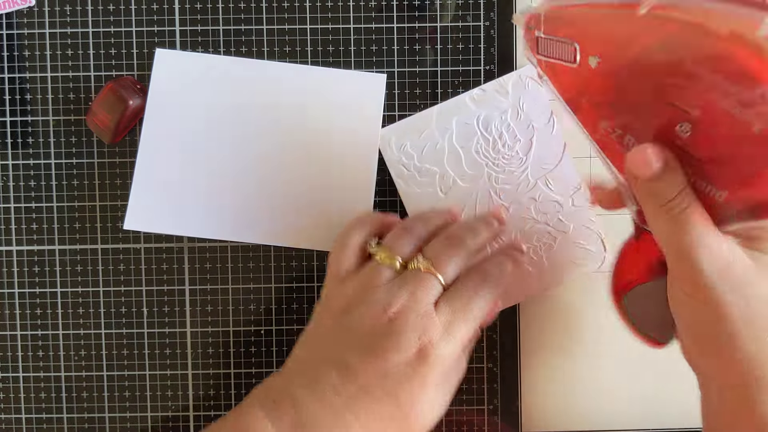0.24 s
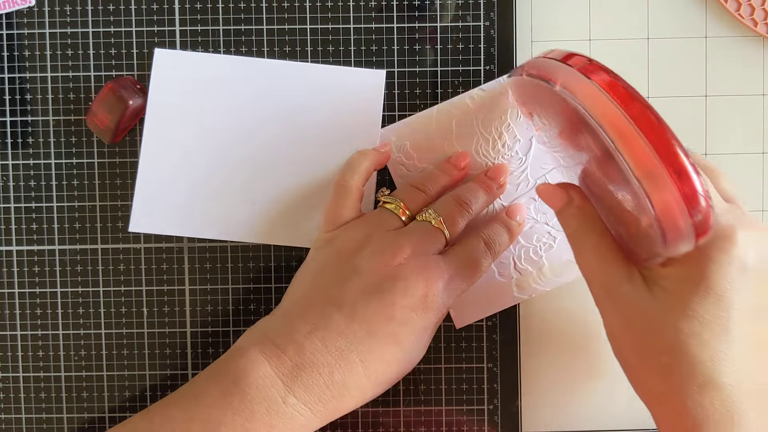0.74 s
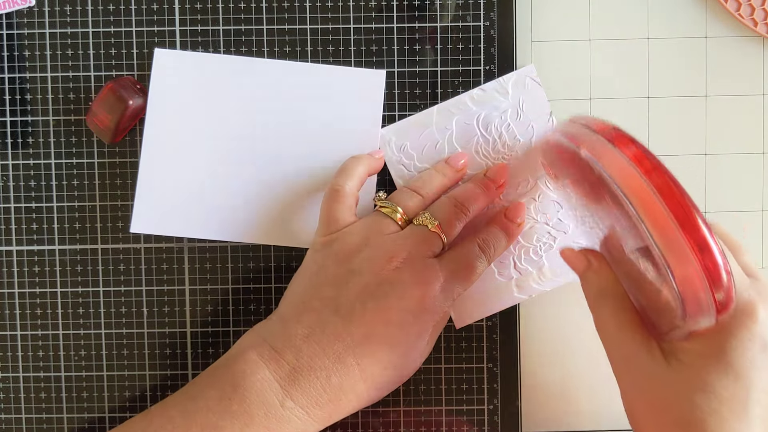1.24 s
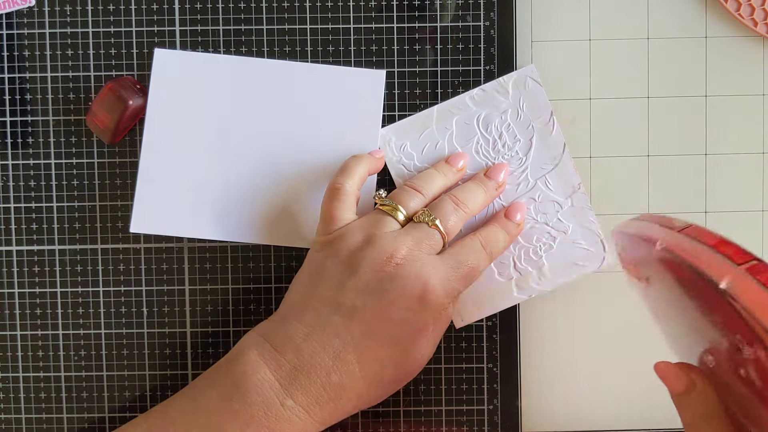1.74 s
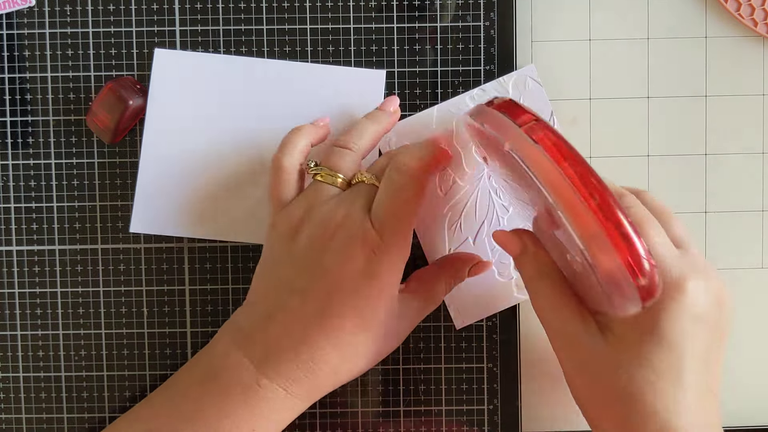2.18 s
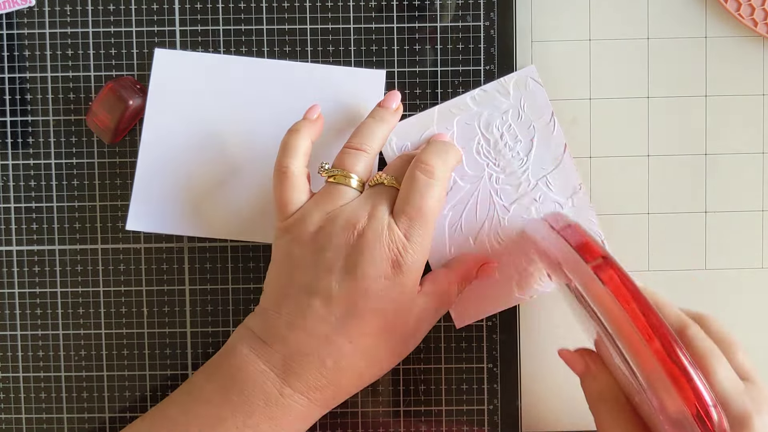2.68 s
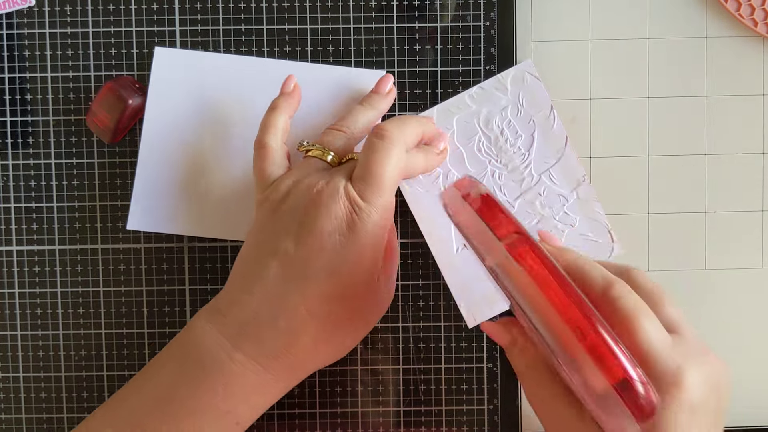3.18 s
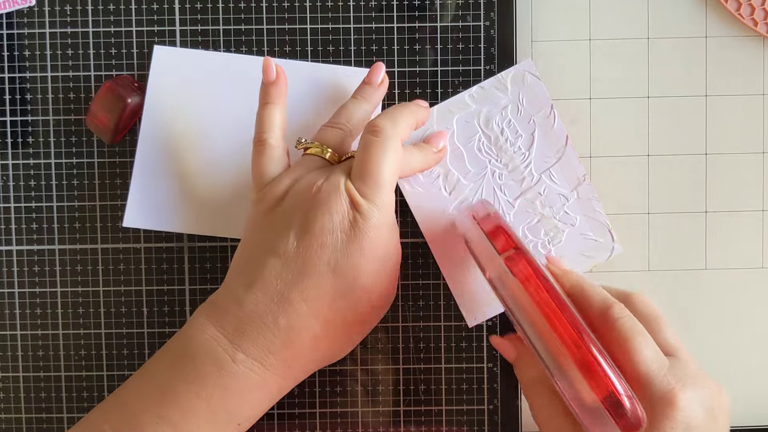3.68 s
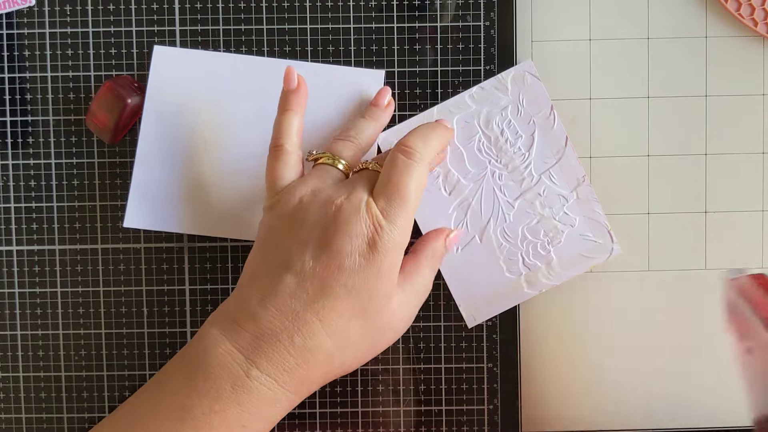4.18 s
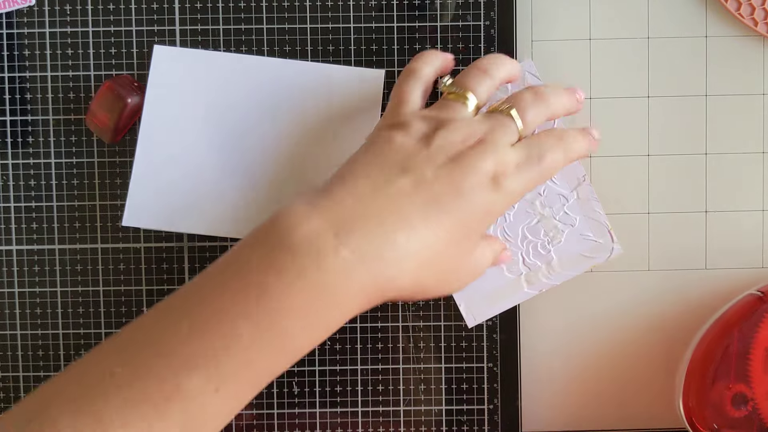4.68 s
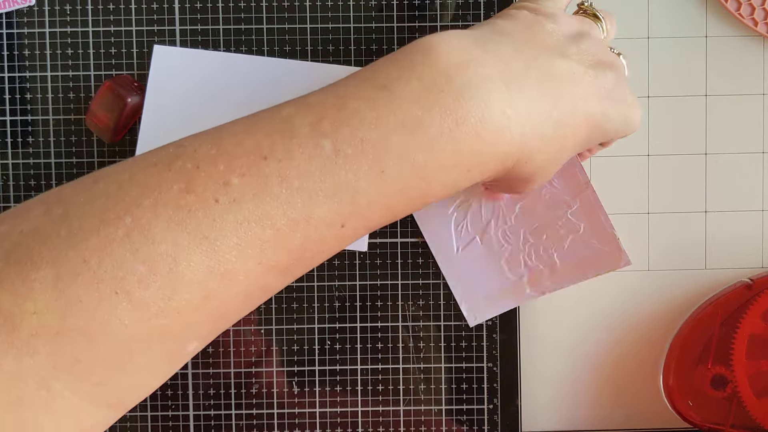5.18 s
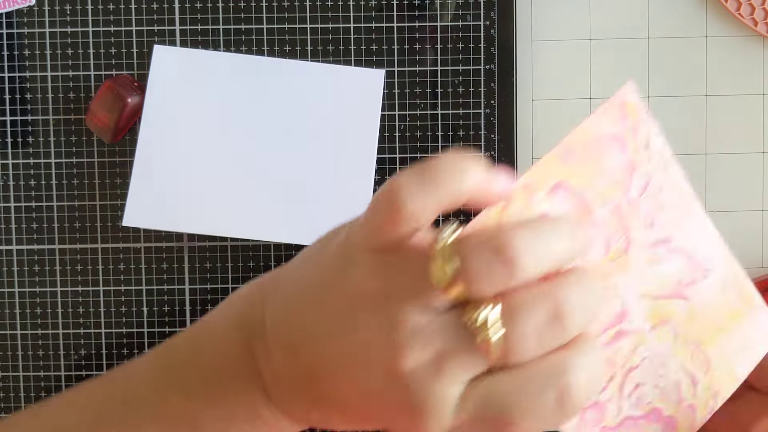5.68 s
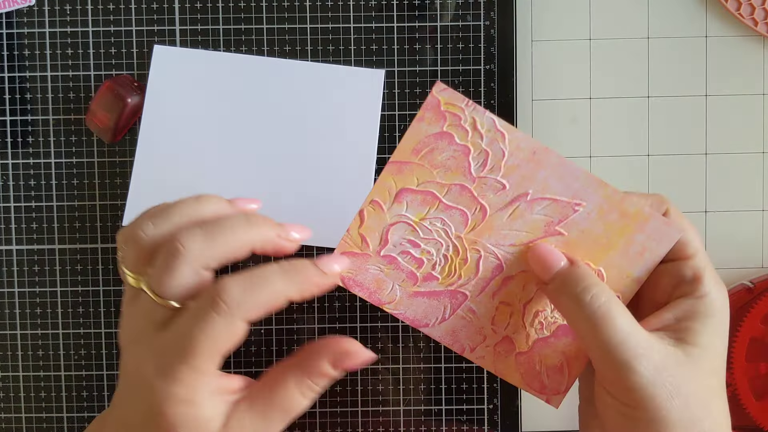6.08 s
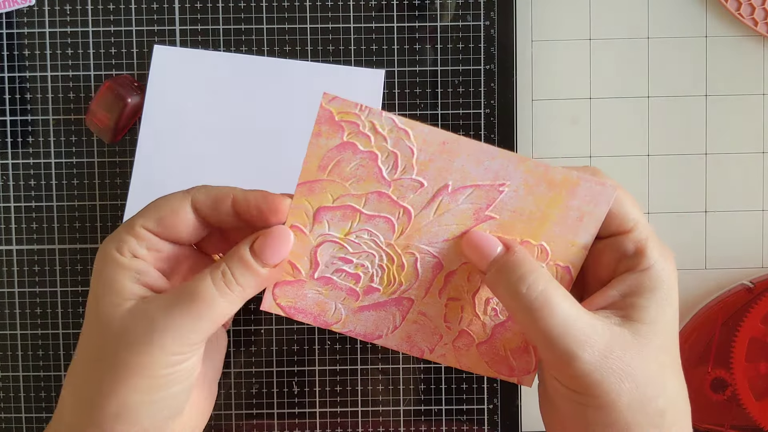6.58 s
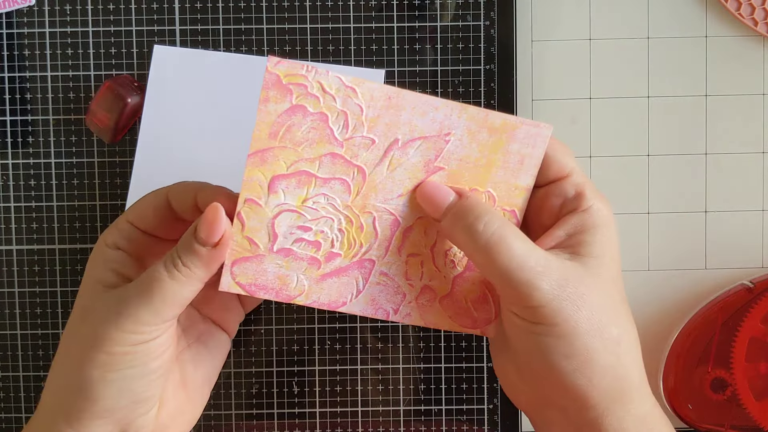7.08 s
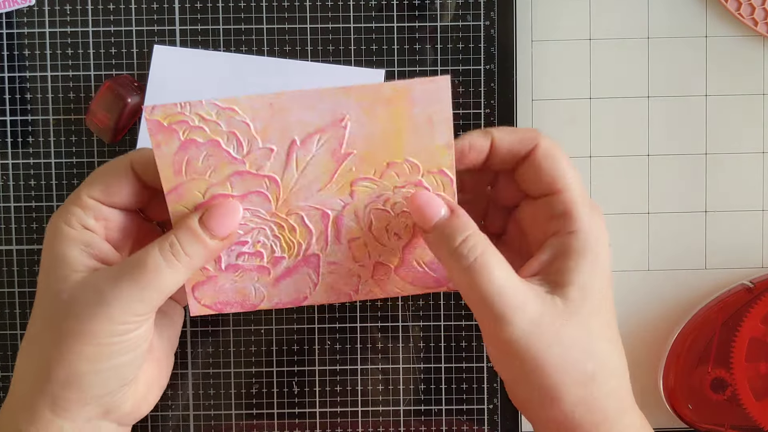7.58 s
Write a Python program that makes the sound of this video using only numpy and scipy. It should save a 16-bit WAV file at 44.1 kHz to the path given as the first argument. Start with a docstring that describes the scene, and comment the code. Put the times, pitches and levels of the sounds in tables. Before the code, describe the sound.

Quiet hum and soft low rumble, with a few light plastic clicks. Three bright, gritty bursts of gear teeth and ratchet clicks follow, as adhesive is rolled onto card. Then comes a hollow plastic drop with a short rattle, a woody knock on the table, fingertip ticks, a brief card scuff, and crisp taps at the end. Heard close up in stereo with a short room echo, leaning left.

```python
"""Tape runner on a craft table

A plastic tape runner lays three strokes of adhesive on a card panel, in a small humming room.
Gear teeth, ratchet clicks and crackling glue ring its hollow housing; random bumps make the roller rumble.
The runner is put down with a dull knock, a hand knocks too, and the panel is lifted and turned with clicks.
Bursts of tiny slips drive the touches; sliding tones make whistles; sines and tinted noise fill the room.
"""
import sys
import numpy as np
from scipy import signal
from scipy.fft import rfft, irfft
from scipy.io import wavfile
from scipy.ndimage import uniform_filter1d

SR = 44100
rng = np.random.default_rng(int(sys.argv[2]) if len(sys.argv) > 2 else 0)


def write(x):
    x = np.atleast_2d(x).T
    wavfile.write(sys.argv[1], SR, np.round(np.clip(x, -1, 1) * 32767).astype(np.int16))


N = 345744
TIME = np.arange(N) / SR  # s

# Levels in the tables are relative: the shapes are rescaled and some layers get a gain later.

# Mains hum: (frequency [Hz], level [dB])
HUM_TONES = [(100, -53), (200, -64), (300, -72), (400, -76)]
# Spectrum of the low room rumble: (frequency [Hz], level [dB])
RUMBLE_SPECTRUM = [(8, -19.5), (22, 6.5), (42, -0.5), (63, -8), (85, -10), (125, -3), (165, -2.5),
                   (240, -9.5), (305, -4), (380, -16), (520, -24), (900, -68.5)]
# Spectrum of the soft hiss: (frequency [Hz], level [dB])
AIR_SPECTRUM = [(210, -48), (350, -16), (398, -3), (424, -11.5), (513, -7.5), (574, -19.5), (621, -8.5),
                (673, -17), (971, -20), (2050, -33), (3820, -27), (5010, -34.5), (5790, -28.5),
                (6680, -34.5), (15800, -37.5)]
# How alike left and right are: (frequency [Hz], likeness [-1 to 1])
LIKENESS = [(35, 0.82), (70, 0.32), (150, 0.25), (300, 0.088), (700, 0.16), (1400, 0.29), (3000, 0.036),
            (16000, 0.021)]
# How much louder left is than right: (frequency [Hz], difference [dB])
LEFT_OVER_RIGHT = [(60, 1.8), (200, 2.4), (400, 3.5), (1000, 4.5), (2400, 4.5), (4500, 5.5), (8000, 4.5),
                   (15000, 9)]
# How long the room echo takes to fall by 60 dB: (frequency [Hz], time [s])
ECHO_TIMES = [(200, 0.48), (530, 0.24), (1400, 0.34), (4500, 0.41), (9000, 0.43), (15000, 0.27)]

# Loose plastic parts of the runner click: (time [s], level [dB], rattle length [s])
RATTLE_EVENTS = [(.248, -56.5, .005), (2.004, -48.5, .003), (2.174, -55.5, 0.0032), (2.275, -47, .0018),
                 (3.039, -44, .0022), (4.086, -39.5, 0.0022), (4.348, -52, .003), (4.9, -40.5, 0.015),
                 (4.961, -47.5, 0.013)]
# The grip tightens and the plastic ticks: (time [s], level [dB], contact length [s])
GRIP_EVENTS = [(.553, -43.5, 0.00084), (.5615, -49.5, 0.00075), (3.028, -47, .0007), (4.087, -43, .002)]
# Spectrum of those ticks: (frequency [Hz], level [dB])
GRIP_SPECTRUM = [(300, -23), (2200, -19), (3050, -4), (3650, 4.5), (4200, -10), (7000, -18), (16000, -31)]

# Card tapped against the table, with brief scuffs of its edge at 0.889 s and 4.251 s: (time [s], level [dB],
# contact length [s])
TAP_EVENTS = [(.889, -43.5, .017), (2.316, -42.5, 0.0045), (4.251, -47, .012), (6.71, -49, 0.00081),
              (7.478, -37.5, 0.0011), (7.542, -38.5, .004), (7.773, -37, 0.0012), (7.8, -36.5, 0.0018)]
# Spectrum of the taps: (frequency [Hz], level [dB])
TAP_SPECTRUM = [(150, -35.5), (250, -2), (525, -0.5), (1030, -6), (1330, -7.5), (1990, -16), (2320, -9.5),
                (2620, -14), (2950, -9.5), (3890, -9.5), (4390, -12.5), (5790, -10.5), (6770, -17),
                (14500, -19), (15500, -19)]
# Spectrum of the dragging panel edge: (frequency [Hz], level [dB])
SCUFF_SPECTRUM = [(150, -43), (250, -8), (559, -1), (1510, -22), (2060, -12.5), (2400, -17), (3750, -15),
                  (4760, -23), (5550, -14.5), (6940, -25), (15000, -24)]
SCUFF_S, SCUFF_DB, SCUFF_RISE_S, SCUFF_FALL_S = 5.958, -39.5, 0.019, 0.0089

# Strokes of the runner: (start [s], length [s], ratchet steps [count], speed at the ends [0-1],
# skew of the speed arch [under 1 = early peak], gear level [dB], ratchet level [dB],
# roller level [dB], shift of the roller's resonances [factor])
STROKE_ROWS = [(1.0898, .6398, 17, .49, 1.06, -40.3, -28.7, -49, 1.04),
               (2.4548, .4208, 14, .35, .75, -39, -31, -46.3, 1),
               (3.628, .3455, 11, .26, .9, -37.6, -30, -48, .9)]
# Resonances of the hollow housing: (frequency [Hz], width before scaling [Hz], level [dB])
HOUSING_MODES = [(1600, 1250, -21.5), (2424, 140, -18), (3390, 550, -13), (4410, 480, -3.5),
                 (4910, 330, -3.5), (5420, 410, 2), (5905, 470, -5.5), (7540, 1200, -11.5),
                 (9570, 710, -13), (12800, 2900, -20), (14270, 1250, -9.5), (16600, 2200, -4.5)]
# Spectrum of roller on card and table, before each stroke's shift: (frequency [Hz], level [dB])
ROLLER_SPECTRUM = [(10, -35), (30, -9), (45, 3), (68, -3), (130, -14.5), (290, -25.5), (370, -14), (435, 4),
                   (520, -5), (620, -4.5), (800, -11.5), (1010, -6.5), (1250, -20.5), (2500, -22),
                   (5000, -35.5)]
GEAR_SWELL_DB, ROLLER_SWELL_DB = 5, 8  # how much quieter the ends of a stroke are than its middle
RATCHET_SPREAD_DB, RATCHET_SLOW_DB = 2.05, 3.5  # scatter of the clicks, and their gain at the ends
RUN_ON_S = .016  # the reel keeps turning after the last ratchet click

# Hollow tones as the runner is seated, one nearly steady and one sinking:
# (time [s], length [s], start pitch [Hz], end pitch [Hz], level before flutter [dB])
SEATING_TONES = [(2.312, 0.0267, 933, 940, -53), (2.335, 0.071, 926, 858, -63.5)]
# Faint whistles: (time [s], length [s], start pitch [Hz], end pitch [Hz], level before flutter [dB])
WHISTLE_TONES = [(4.84, .06, 4300, 4100, -68.5), (4.968, .14, 4550, 4700, -74),
                 (5.61, 0.12, 5450, 5630, -72.5), (5.68, 0.063, 3650, 3490, -71),
                 (5.736, 0.15, 6300, 6340, -75), (5.72, 0.29, 3200, 3070, -75)]

# Fingertips tick on the hollow housing and the bowed card: (time [s], level [dB], ring pitch [Hz])
FINGER_EVENTS = [(3.0, -44.5, 2060), (4.054, -44.5, 1810), (4.751, -46.5, 2340), (5.175, -48.5, 1685),
                 (5.22, -50, 1600), (5.343, -50, 1750), (5.9087, -37, 2190), (5.947, -34.5, 2350),
                 (6.834, -52, 1760), (7.204, -47.5, 1750), (7.327, -46.5, 1800)]

# The runner lands on the table: (time [s], level [dB], rattle length [s])
LANDING_EVENTS = [(4.455, -37.5, 0.0092), (4.4815, -34.5, 0.005), (4.5138, -29.5, 0.0014),
                  (4.516, -30, 0.0011), (4.53, -39, 0.017), (4.553, -41, 0.011), (4.608, -40, 0.0083)]
# Broad thud of the runner's shell: (frequency [Hz], level [dB])
SHELL_SPECTRUM = [(50, -26), (100, 2), (150, -1.5), (260, -20.5), (400, -7), (600, -3.5), (800, -6.5),
                  (1150, -4.5), (1450, -8.5), (2150, -3.5), (3000, -3), (4100, -6.5), (4900, -12.5),
                  (5800, -7.5), (6500, -15), (16000, -29)]
# Ringing of the shell: (frequency [Hz], level [dB], time to fall by 60 dB [s])
SHELL_RING = [(94.7, 4.5, 0.86), (120, -5.5, 0.5), (158, -10, 0.26), (626, -1, 0.13), (790, 0, .13),
              (1073, 3, 0.091), (1720, -4, 0.11), (2180, 1, 0.074), (2945, -18, 0.11), (3250, -21, 0.17),
              (4220, -8, 0.14)]

# Dull knocks on the table, the first from the runner set down and the rest from a hand:
# (time [s], level [dB], contact length [s])
KNOCK_EVENTS = [(4.555, -47, .005), (5.3888, -29.5, 0.0011), (5.4, -36.5, 0.0038), (5.411, -42, 0.0054)]
# Broad thud of the table top: (frequency [Hz], level [dB])
TABLE_SPECTRUM = [(60, -30), (130, 0), (240, -8), (330, 3.5), (460, 5.5), (620, -0.5), (850, -9.5),
                  (1150, -5.5), (1400, -21), (3000, -17.5), (4500, -26.5), (7000, -32.5), (16000, -35)]
# Ringing of the table top: (frequency [Hz], level [dB], time to fall by 60 dB [s])
TABLE_RING = [(162, -6, 0.35), (338.6, 3.5, 0.2), (466, -13, 0.087), (617, -12, .12), (790, -7, 0.11),
              (1128, -2, 0.055), (1656, -7, 0.038)]


def amp(db):
    """Turns decibels into a gain."""
    return 10 ** (np.asarray(db) / 20)


def unit(x):
    """Scales a sound to an rms (average strength) of 1."""
    return x / np.sqrt(np.mean(x ** 2) + 1e-20)


def read(points, hz):
    """Joins the points of a spectrum with straight lines on a log-frequency axis."""
    f, value = np.transpose(points)
    return np.interp(np.log(hz + 1), np.log(f + 1), value)


def add(mix, s, sound):
    """Mixes a sound in at time s."""
    part = mix[max(round(s * SR), 0):][:len(sound)]
    part += sound[:len(part)]


def bins(size=4096):
    """Lists the frequencies of a spectrum taken over this many samples."""
    return np.fft.rfftfreq(size, 1 / SR)


def ring(db):
    """Gives the response, of energy 1, of a body with this spectrum; it starts at once when struck."""
    log_gain = np.log(amp(np.r_[db, db[-2:0:-1]]))
    minimum_phase = np.exp(np.conj(signal.hilbert(log_gain)))
    response = np.fft.ifft(minimum_phase).real[:len(db)]
    return response / np.linalg.norm(response)


def through(x, response):
    """Passes a sound through a response."""
    return signal.oaconvolve(x, response)[:N]


def tint(x, points):
    """Colours a long sound with a spectrum."""
    return irfft(rfft(x) * amp(read(points, bins(size=N))), N)


def paired(x):
    """Makes two unrelated channels as alike as two close microphones hear them."""
    size = x.shape[1]
    left, other = rfft(x)
    alike = np.clip(read(LIKENESS, bins(size=size)), -1, 1)
    right = alike * left + np.sqrt(1 - alike ** 2) * other
    return irfft(np.array([left, right]), size)


def evened(h, count=90):
    """Keeps the timing of a scattered response but leaves it no broad colour; energy 1."""
    size = 2 ** 15
    power = uniform_filter1d(abs(rfft(h, size)) ** 2, count)[::8]  # down to the grid of bins()
    opposite_colour = ring(-10 * np.log10(power + 1e-9))
    flat = signal.fftconvolve(h, opposite_colour)[:len(h)]
    return flat / np.linalg.norm(flat)


def contact(length, scuff=4.5, unevenness=.6):
    """A sharp touch and the tiny fading slips that follow it, of energy 1."""
    t = TIME[:SR // 8]
    sizes = rng.standard_normal(len(t)) * rng.exponential(1, len(t)) ** unevenness
    slips = sizes * np.exp(-t / max(length, 1e-4))
    push = scuff * slips / np.linalg.norm(slips)
    push[0] += 1
    return evened(push, count=300)


def blows(rows):
    """A train of contacts; each level sets the energy as a power held for 2 ms."""
    force = np.zeros(N)
    for s, db, length in rows:
        add(force, s, amp(db) * np.sqrt(SR / 500) * contact(length))
    return force


def struck(spectrum, modes, modes_db):
    """A struck body gives a broad thud with a few fading tones on top."""
    t = TIME[:SR // 2]
    body = sum(amp(db - 60 * t / t60) * np.sin(2 * np.pi * hz * t) for hz, db, t60 in modes)
    body *= amp(modes_db) / np.linalg.norm(body)
    add(body, 0, ring(read(spectrum, bins())))
    return body


def room(x, wet_db, left_db, early_db=-2, early_s=0.013):
    """Direct sound, quick reflections off the table, and a diffuse tail."""
    t = TIME[:SR // 2]
    taps = rng.choice([-1., 1.], (2, len(t))) * (rng.random((2, len(t))) < 5000 / SR)
    fade_in = np.clip(t / 0.0092 - .5, 0, 1)
    hz, when, z = signal.stft(taps * fade_in, SR, nperseg=256)
    decay = amp(-60 * when / read(ECHO_TIMES, hz)[:, None])  # each frequency fades at its own rate
    tail = signal.istft(z * decay, SR, nperseg=256)[1][:, :len(t)]
    early = taps[:, ::-1] * np.exp(-t / early_s) * (t > .001)
    echoes = amp(wet_db) * unit(tail) + amp(early_db) * unit(early)
    echoes = paired(echoes) / np.sqrt(len(t))
    echoes[:, 0] += [.85, .4]  # direct sound: the right microphone is turned away
    sides_db = [left_db / 2, -left_db / 2]
    return np.array([through(x, evened(h)) * amp(db) for h, db in zip(echoes, sides_db)])


def grains(per_s, spread_db):
    """Random clicks of uneven size, rms 1."""
    sizes = amp(spread_db * np.minimum(rng.exponential(1, N), 3)) * rng.choice([-1, 1], N)
    return unit(sizes * (rng.random(N) < per_s / SR))


def click_tone(body_db, hollow_db, snap_db, hollow_hz=1780, hollow_width_hz=260):
    """A click has a papery middle, with more or less table body, hollow ring and dry snap."""
    hz = bins()
    hollow = 1 / (1 + (2 * (hz - hollow_hz) / hollow_width_hz) ** 2)
    body = [(100, body_db - 17), (330, body_db), (600, body_db + 5), (1200, body_db - 5.0)]
    middle = [(1500, hollow_db / 2 - 4.5), (2250, hollow_db / 2 - 2.5), (2900, -0.93), (3900, 0.69)]
    snap = [(4800, snap_db / 2 - 1.5), (5800, snap_db / 2 + 3.5), (6700, snap_db), (15000, snap_db - 5)]
    broad_power = amp(read(body + middle + snap, hz)) ** 2
    return ring(10 * np.log10(broad_power + amp(hollow_db) ** 2 * hollow ** 2))


def background(rumble_db=-57.0, air_db=-64.5, waver=0.053):
    """Gently wavering mains hum over low room rumble and soft hiss."""
    sway = unit(tint(rng.standard_normal(N), [(0, 0), (4, 0), (20, -60), (100, -120)]))
    hum = sum(amp(db) * np.sqrt(2) * np.sin(2 * np.pi * (hz * TIME + rng.random()))
              for hz, db in HUM_TONES)
    rumble = amp(rumble_db) * unit(tint(paired(rng.standard_normal((2, N))), RUMBLE_SPECTRUM))
    air = amp(air_db) * unit(tint(paired(rng.standard_normal((2, N))), AIR_SPECTRUM))
    return hum * (1 + waver * sway) + rumble + air


def rattles():
    """Thin, bright clicks of the runner as it is lifted and as it settles: touches with little body."""
    clicks = through(blows(RATTLE_EVENTS), click_tone(body_db=-6, hollow_db=-12, snap_db=-6))
    return room(clicks, wet_db=-2, left_db=3.5, early_db=-2.0)


def grip():
    """Short, dry ticks of plastic under a tightening grip; the first two come close together."""
    tick = through(blows(GRIP_EVENTS), ring(read(GRIP_SPECTRUM, bins()))) * amp(1.5)
    return room(tick, wet_db=-13, left_db=0, early_db=-11)


def card():
    """The card taps the table with a papery knock and scuffs it briefly twice; its edge drags once as the panel
    is picked up."""
    taps = through(blows(TAP_EVENTS), ring(read(TAP_SPECTRUM, bins())))
    rise, fall = (SCUFF_S - TIME) / SCUFF_RISE_S, (TIME - SCUFF_S) / SCUFF_FALL_S
    swell = np.exp(-np.maximum(rise, fall))
    drag = amp(SCUFF_DB) * swell * grains(2500, 2.5)
    scuff = through(drag, ring(read(SCUFF_SPECTRUM, bins())))
    return room(taps + scuff, wet_db=-3.5, left_db=2.5, early_db=-2.5)


def stroke(start, length, steps, end_speed, skew, gear_db, ratchet_db, roller_db):
    """The hand speeds up, presses and eases off in one arch; the ratchet clicks at equal steps of tape."""
    u = np.clip((TIME - start) / length, 0, 1)  # how far through the stroke
    down = (TIME >= start) & (TIME <= start + length + RUN_ON_S)
    ease = 1 - np.sin(np.pi * u)  # 1 at the ends, 0 in the middle
    speed = down * (end_speed + (1 - end_speed) * np.sin(np.pi * u ** skew))
    tape = np.cumsum(speed * (u < 1))
    at = np.searchsorted(tape / tape[-1], np.linspace(1e-9, 1, round(steps) + 1))
    scatter_db = RATCHET_SPREAD_DB * rng.standard_normal(len(at))
    ratchet = np.zeros(N)
    ratchet[at] = amp(ratchet_db + RATCHET_SLOW_DB * ease[at] + scatter_db)
    effort = down * amp(gear_db - GEAR_SWELL_DB * ease ** 2)
    pressure = down * amp(roller_db - ROLLER_SWELL_DB * ease)
    return speed, effort, pressure, ratchet


def chatter(impacts, decay_s):
    """Loose plastic parts chatter for a moment after every impact: noise with a fading level."""
    fade = np.exp(-2 * TIME[:1024] / decay_s)
    power = abs(through(impacts ** 2, fade / fade.sum()))
    return np.sqrt(power) * rng.choice([-1., 1.], N)


def travelling(x, paths_per_s=5, count=4):
    """As the runner travels, the sound fades in turn through a cycle of four reflection patterns."""
    place = TIME * paths_per_s
    near = [np.clip(1 - abs((place - k + 1) % count - 1), 0, 1) for k in range(count)]
    return sum(room(x * np.sqrt(share), wet_db=0.5, left_db=1.5, early_db=2) for share in near)


def runner(full_teeth_per_s=140, jitter=.15, teeth_spread_db=3.0, peel_db=-4):
    """Gear teeth, the ratchet and peeling glue ring the housing; the roller bumps over the card."""
    speed, effort, ratchet, roll = np.zeros((4, N))
    bumps = grains(1500, 1.7)
    for *row, tuning in STROKE_ROWS:
        pace, gears, pressure, clicks = stroke(*row)
        speed, effort, ratchet = speed + pace, effort + gears, ratchet + clicks
        roll += through(pressure * bumps, ring(read(ROLLER_SPECTRUM, bins() / tuning)))

    # a tooth strikes each time the turning adds up to one more whole tooth
    wobble = unit(uniform_filter1d(rng.standard_normal(N), 500))
    turning = np.sqrt(speed) * np.exp(jitter * wobble)
    tooth = np.diff(np.floor(np.cumsum(full_teeth_per_s * turning) / SR), prepend=0)
    tooth_gain = amp(teeth_spread_db * rng.standard_normal(N)) * np.sqrt(SR / full_teeth_per_s)
    drive = chatter(tooth * effort * tooth_gain, decay_s=0.002)
    drive += chatter(ratchet * np.sqrt(SR / 500), decay_s=0.0037)
    drive += amp(peel_db) * effort * grains(2500, 1.4)  # glue crackling off the reel

    power = sum(amp(db) ** 2 / (1 + ((bins() - hz) / (0.59 * width)) ** 2) ** 2
                for hz, width, db in HOUSING_MODES)
    housing = ring(10 * np.log10(power + amp(-24.5) ** 2))  # with a faint even floor
    return travelling(through(drive, housing) * amp(1.0) + roll)


def glides(rows, flutter=0.56):
    """Thin, fluttering tones that slide in pitch."""
    out = np.zeros(N)
    for s, length, start_hz, end_hz, db in rows:
        hz = np.linspace(start_hz, end_hz, int(length * SR))
        tone = np.sin(2 * np.pi * np.cumsum(hz) / SR)
        add(out, s, amp(db) * tone * signal.windows.tukey(len(hz), .3))
    return out * (1 + flutter * unit(uniform_filter1d(rng.standard_normal(N), 260)))


def whistles():
    """The seating tones of the runner and a few faint high whistles: sliding sines in the room."""
    return room(glides(SEATING_TONES) + glides(WHISTLE_TONES), wet_db=-1.5, left_db=4.5, early_db=-12)


def fingers(touch_s=.004):
    """Soft ticks of the fingertips: each touch rings a hollow body at its own pitch."""
    out = np.zeros(N)
    for s, db, hz in FINGER_EVENTS:
        tone = click_tone(body_db=9.5, hollow_db=13, snap_db=-9, hollow_hz=hz, hollow_width_hz=340)
        add(out, s, amp(db) * np.sqrt(SR / 500) * signal.fftconvolve(contact(touch_s), tone))
    return room(out, wet_db=-8, left_db=2.0, early_db=-2.0)


def landing():
    """The hollow runner touches, drops and rattles to rest; each contact rings its shell."""
    shell = struck(SHELL_SPECTRUM, SHELL_RING, modes_db=-6.5)
    sound = through(blows(LANDING_EVENTS), shell) * amp(4.0)
    return room(sound, wet_db=-0.5, left_db=2.5, early_db=-2.5)


def knocks():
    """Dull knocks, one from the runner set down and the rest from a hand, ring the table top."""
    table = struck(TABLE_SPECTRUM, TABLE_RING, modes_db=-2.5)
    sound = through(blows(KNOCK_EVENTS), table) * amp(5.0)
    return room(sound, wet_db=-1.5, left_db=3, early_db=-0.5)


def scene():
    """Everything on and around the table."""
    handling = rattles() + grip() + card() + runner() + whistles()
    return background() + handling + fingers() + landing() + knocks()


def record(dry, edge_hz=15800):
    """The left microphone is louder and brighter; then the highest treble is cut off."""
    lean_db = read(LEFT_OVER_RIGHT, bins(size=N)) / 2
    heard = irfft(rfft(dry) * amp([lean_db, -lean_db]), N)
    low_pass = signal.firwin(1023, edge_hz, window=("kaiser", 8), fs=SR)
    return signal.oaconvolve(heard, low_pass[None], "same")


dry = scene()
out = record(dry)
write(out)
```